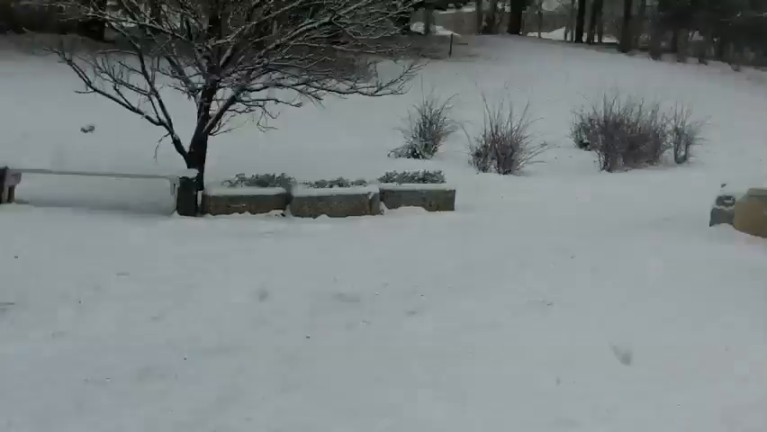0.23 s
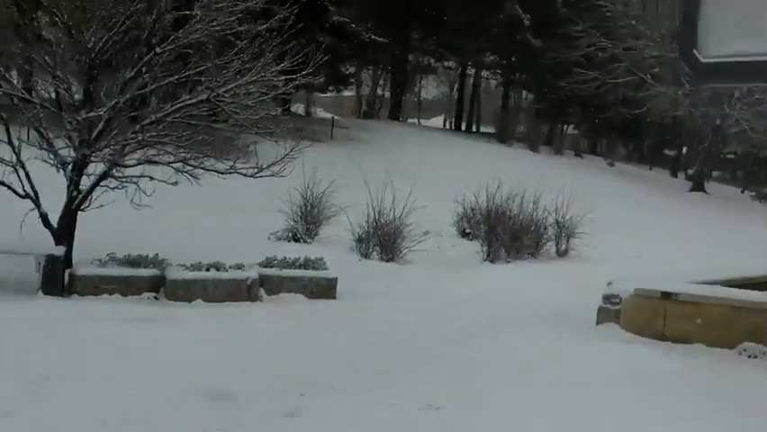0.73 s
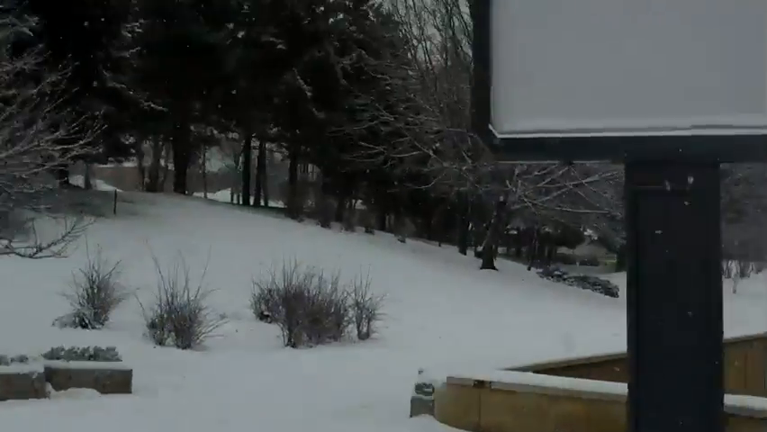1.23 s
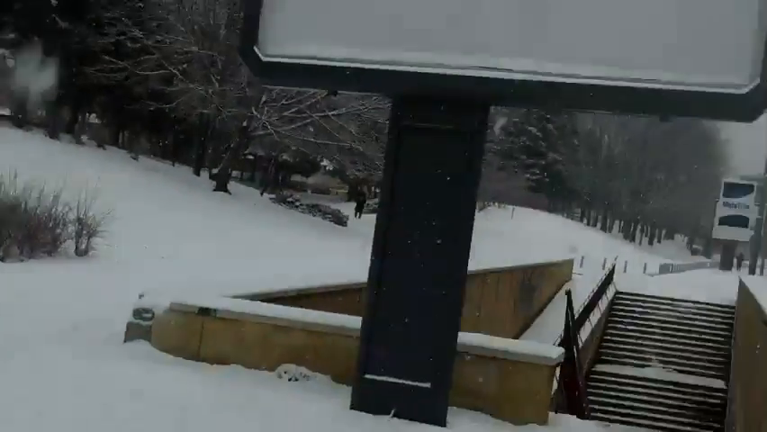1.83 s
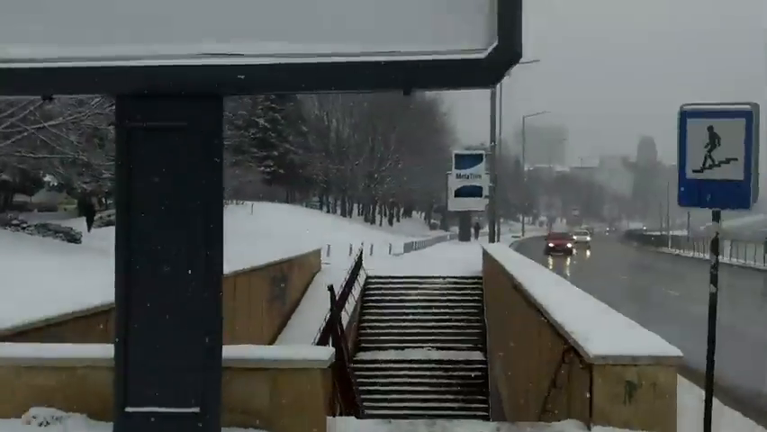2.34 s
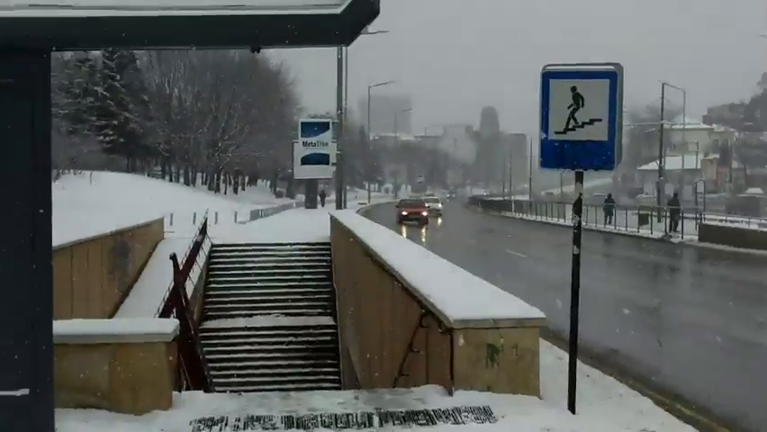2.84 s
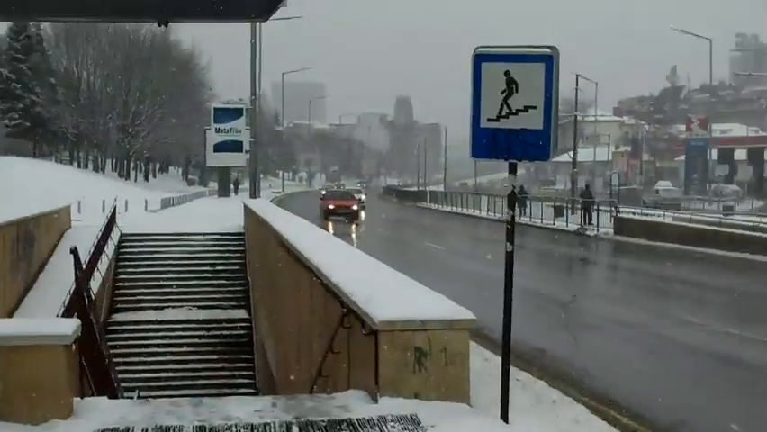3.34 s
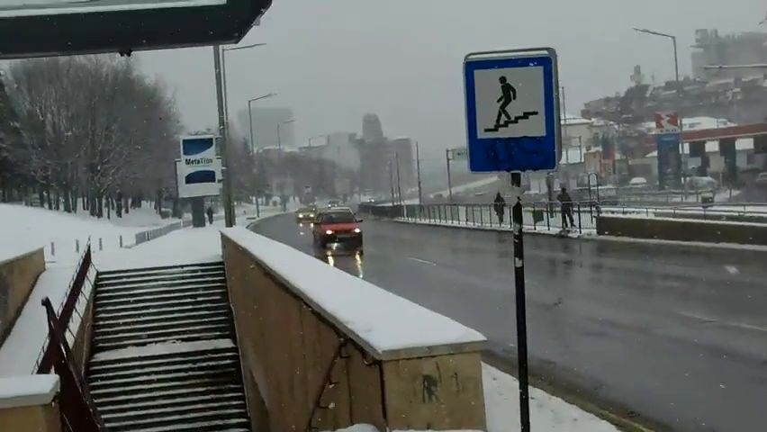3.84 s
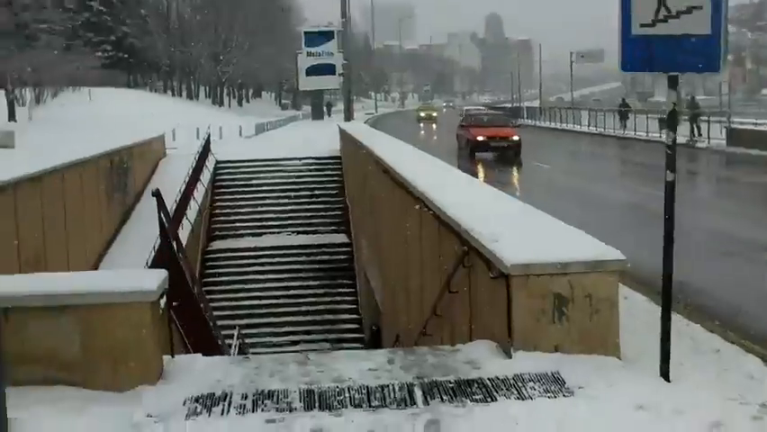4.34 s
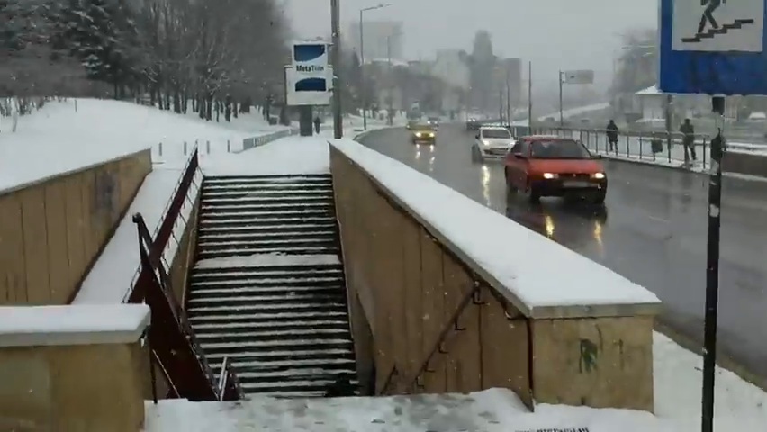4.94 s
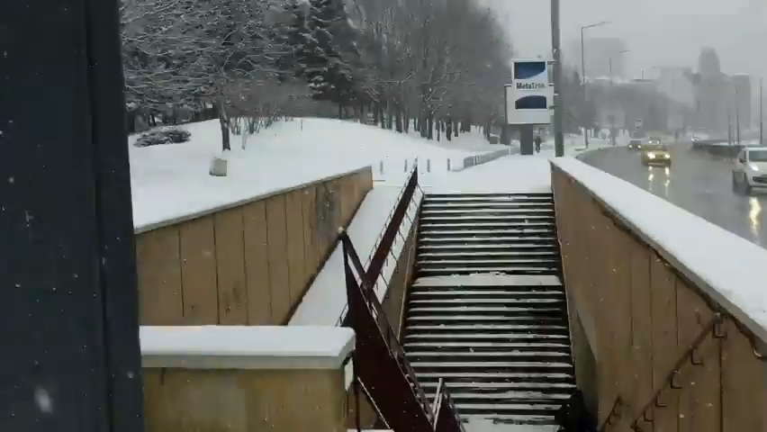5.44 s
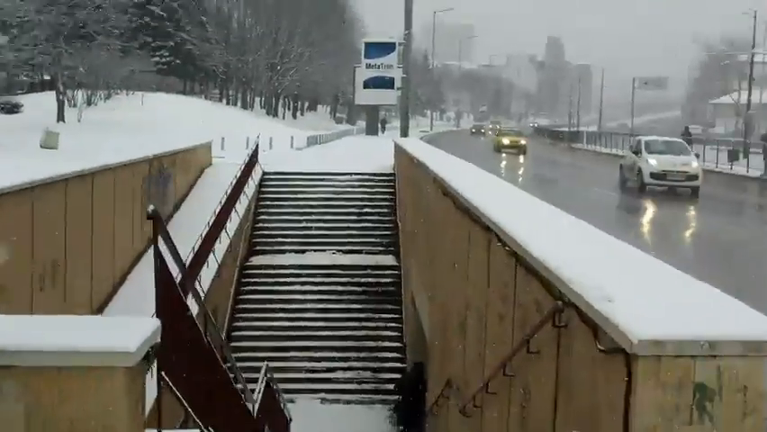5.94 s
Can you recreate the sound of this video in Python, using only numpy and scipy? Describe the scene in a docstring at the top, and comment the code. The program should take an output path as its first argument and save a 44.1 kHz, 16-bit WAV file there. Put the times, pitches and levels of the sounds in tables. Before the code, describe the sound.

An open, snowy roadside, heard through one slightly hissy microphone, equal in both ears. Low, steady city wash and faint engine hum lie beneath everything. From 0 to 0.65 seconds a few soft, low snowflake pats touch the microphone while a car's wet tyre swish grows. Short surges of hiss come at 0.7 to 1.0 seconds, and the car passes close at about 1.5, with a hollow swish gliding downward, grainy spray and a singing tread roar around 800 to 900 hertz. Treble drops away behind it; a dull double knock comes near 1.9. The roar recedes through 2 to 3.5 seconds, unevenly. A small slushy tick sounds at 4.1. From 4.3 a second car approaches, with brighter sizzle, fine spray and a low engine hum. A sharp slush splash hits at 5.7, and the wet hiss keeps swelling to the end at 6.2, as the car arrives.

```python
"""Cars on a slushy road

Heard from a snowy pavement: one car goes by after a second and a half and recedes; the next draws near
and splashes through slush near the end. Tyre roar, swish and spray are coloured noise and droplets
whose level follows each car's position. Faint engine hum is made of gliding cosines,
and snowflakes pat the microphone as short damped swings."""
import sys
import numpy as np
from scipy import signal
from scipy.fft import rfft, irfft, next_fast_len
from scipy.io import wavfile
from scipy.ndimage import uniform_filter1d

SR = 44100
rng = np.random.default_rng(int(sys.argv[2]) if len(sys.argv) > 2 else 0)


def generate_wav(sig):
    """Save sig (samples, or channels by samples) to the path in sys.argv[1] as 16-bit PCM at SR."""
    pcm = np.round(np.clip(np.atleast_2d(sig).T, -1, 1) * 32767).astype(np.int16)
    wavfile.write(sys.argv[1], SR, pcm)


N = 272777
HOP = 128  # samples between spectral frames
HZ = np.fft.rfftfreq(8 * HOP, 1 / SR)
FRAME_S = np.arange(N // HOP + 9) * HOP / SR
TIME = np.arange(N) / SR


def gain_of(db):
    """Decibels to amplitude."""
    return 10 ** (np.asarray(db) / 20)


def evened(x):
    """Scales to rms 1."""
    return x / np.sqrt(np.mean(x ** 2) + 1e-20)


def noise():
    """White noise of rms 1."""
    return rng.standard_normal(N)


def colour(points, hz):
    """Gain of a spectrum table, joined on a log-frequency axis and falling away beyond both ends."""
    f, db = np.transpose(points)
    ends = np.minimum(hz / f[0], 1) ** 2 / np.maximum(hz / f[-1], 1) ** 3
    return ends * gain_of(np.interp(np.log(hz + 1), np.log(f + 1), db))


def follow(rows, t):
    """All columns of a curve table at the times t."""
    s, *columns = np.transpose(rows)
    return [np.interp(t, s, c) for c in columns]


def active(rows):
    """Opens over the time span of a curve table, with short ramps at both ends."""
    inside = (TIME >= rows[0][0]) & (TIME <= rows[-1][0])
    return uniform_filter1d(1. * inside, size=4000)


def tinted(x, points):
    """Filters x by a spectrum table, to rms 1."""
    size = next_fast_len(N)
    gain = colour(points, np.fft.rfftfreq(size, 1 / SR))
    return evened(irfft(rfft(x, size) * gain, size)[:N])


def shaped(x, points, shift=1, focus=1, lift_db=0, patchy_db=1.3):
    """Colours x by a sliding, narrowing spectrum; turbulent air and wet ground leave drifting patches."""
    z = signal.stft(x, nperseg=8 * HOP, noverlap=7 * HOP)[2].T
    grain = rng.standard_normal((len(FRAME_S), len(HZ)))
    drifting = uniform_filter1d(grain, size=40, axis=0)
    patches = evened(uniform_filter1d(drifting, size=8, axis=1))
    gain = colour(points, HZ / shift) ** np.maximum(focus, .5) * gain_of(lift_db + patchy_db * patches)
    return evened(signal.istft((z * gain[:len(z)]).T, nperseg=8 * HOP, noverlap=7 * HOP)[1][:N])


def flutter(rate_hz):
    """Smooth random wander of rms 1, mostly below the given rate."""
    f = np.fft.rfftfreq(len(FRAME_S), HOP / SR)
    spectrum = rfft(rng.standard_normal(len(FRAME_S))) / (1 + (f / rate_hz) ** 4)
    slow = irfft(spectrum, len(FRAME_S))
    return np.interp(TIME, FRAME_S, evened(slow))


def droplets(per_s, spread_db):
    """Tiny impacts at random moments: many small, a few large."""
    size = gain_of(spread_db * np.minimum(rng.exponential(1, N), 5))
    return evened(size * rng.choice([-1, 1], N) * (rng.random(N) < per_s / SR))


def water(drops, per_s, spread_db):
    """Rushing water: a smooth hiss of mist with a share of the power in separate droplets."""
    return np.sqrt(1 - drops) * noise() + np.sqrt(drops) * droplets(per_s, spread_db)


STRETCH_EDGE_S = 0.034


def stretches(rows, t):
    """Each column of a table of time stretches, faded in and out at the times t."""
    start, end, *columns = np.transpose(rows)
    entered = np.tanh((t - start[:, None]) / STRETCH_EDGE_S)
    not_left = np.tanh((end[:, None] - t) / STRETCH_EDGE_S)
    return np.array(columns) @ ((entered + not_left) / 2)


# cars passing: abreast t/s, distance then [m], level/dB, tyre horn f/Hz, horn sharpness [factor],
# mist slope [dB per octave]
CARS = [(1.48, 6.06, 0, 840, 1.28, -7), (6.23, 2.69, -7.5, 830, 2.35, 6)]
SPEED_M_PER_S, REFERENCE_M = 14, 6


def drive_by(law, t):
    """Cars on a straight road plus distant traffic: level in dB, power shares, bearing (1 coming, -1 gone)."""
    level_db, loss_db, ahead_db, along_db, far_db = law
    abreast, distance, car_db = np.transpose(CARS)[:3, :, None]
    to_go = SPEED_M_PER_S * (abreast - t)
    reach = np.hypot(to_go, distance)
    bearing = to_go / reach
    spreading_db = loss_db * np.log2(reach / REFERENCE_M)
    direction_db = ahead_db * bearing + along_db * bearing ** 2
    power = gain_of(level_db + car_db - spreading_db + direction_db) ** 2
    total = power.sum(0) + gain_of(far_db) ** 2
    return 10 * np.log10(total), power / total, (power * bearing).sum(0) / total


def loudness(law):
    """Level of one tyre sound in dB, sample by sample."""
    return np.interp(TIME, FRAME_S, drive_by(law, FRAME_S)[0])


MICROPHONE_HISS_DB = -78


def microphone_hiss():
    """Even white self-noise of the microphone."""
    return gain_of(MICROPHONE_HISS_DB) * noise()


WHINE_HZ, WHINE_WIDTH_HZ, WHINE_DB = 7870, 130, -74.5


def whine():
    """A thin steady hiss in one narrow band, faint enough to show only in the lull between cars."""
    offset = (np.fft.rfftfreq(N, 1 / SR) - WHINE_HZ) / WHINE_WIDTH_HZ
    band = rfft(noise()) / (1 + offset ** 2)
    return gain_of(WHINE_DB) * evened(irfft(band, N))


# spectrum of the city wash: f/Hz, relative level/dB
CITY_COLOUR = [(20, -26), (38, -25), (55, -6), (75, -10), (110, -3.5), (170, 1), (270, 2), (400, -7),
               (900, -12), (4000, -13.5)]
CITY_DB = -60.5


def city_wash():
    """The steady low wash of the city: noise through a fixed spectrum."""
    return gain_of(CITY_DB) * tinted(noise(), CITY_COLOUR)


# low noise of tyre walls and bodywork: f/Hz, relative level/dB
RUMBLE_COLOUR = [(50, -13), (120, -12), (220, -5.5), (340, 2.5), (480, 0), (700, -2.5), (1500, -6)]
# how the rumble carries: level at 6 m/dB, loss per doubling of distance/dB, gain ahead of the car/dB,
# gain along the road both ways/dB, distant traffic level/dB
RUMBLE_LAW = (-46.5, 4.5, 2.5, -4, -67)


def rumble():
    """Tyre walls and bodywork shake the air: dull noise that rises and falls with the cars."""
    return gain_of(loudness(RUMBLE_LAW)) * tinted(noise(), RUMBLE_COLOUR)


# engine notes, one table each: t/s, firing f/Hz, level/dB
ENGINES = [
    [(0, 76.5, -68), (1.2, 76.1, -74), (3.5, 75, -79), (4.9, 76.8, -71), (6.19, 77.7, -76)],
    [(1.1, 67, -87), (1.4, 60.7, -75), (1.7, 56, -84), (2.3, 54.1, -86)],
    [(2.8, 91.2, -88), (3.6, 90.86, -73.5), (4.5, 89.9, -71.5), (5.5, 85, -86)],
    [(0, 156.6, -72), (0.42, 151, -63.5), (0.8, 150, -74), (1.1, 148.7, -88)],
    [(4.5, 147, -88), (4.85, 147, -66), (5.4, 149.6, -66), (6.19, 154.6, -69)],
]


def engine(rows, waver=0.0257, throb_db=1.5, octave_db=-11):
    """A firing note, wavering in pitch and level, with a weak octave."""
    hz, db = follow(rows, TIME)
    turn = 2 * np.pi * np.cumsum(hz * (1 + waver * flutter(rate_hz=9.1))) / SR
    note = np.sqrt(2) * (np.cos(turn) + gain_of(octave_db) * np.cos(2 * turn))
    return active(rows) * gain_of(db + throb_db * flutter(rate_hz=7.3)) * note


# snowflakes on the microphone: t/s, push level before the low cut/dB, f/Hz, length [cycles]
PATS = [(0.0486, -22, 560, .68), (0.168, -37, 380, 0.56), (0.4923, -23, 540, 0.89),
        (0.5081, -23, 440, 0.61), (0.515, -31, 420, 1.1), (0.5208, -23, 433, 1.04), (.55, -23.5, 328, 0.71),
        (0.6317, -20.5, 384, 0.63), (0.641, -29, 405, 0.69)]


def pat(s, db, hz, cycles, low_cut_hz=95, tail_db=-24, tail_s=0.017):
    """A soft push of air on the microphone port: a swing or two, then a brief dull rustle."""
    age = TIME - s
    push = np.exp(-(age * hz / cycles) ** 2) * np.cos(2 * np.pi * age * hz)
    fade = (age > 0) * np.exp(-abs(age) / tail_s)
    tail = gain_of(tail_db) * fade * tinted(noise(), RUMBLE_COLOUR)
    low_cut = signal.butter(2, low_cut_hz, "high", fs=SR, output="sos")
    return gain_of(db) * signal.sosfilt(low_cut, push + tail + 1e-18)


def singing(rows, width_hz, steady):
    """Noise in one gliding resonance; the rolling tyre keeps feeding it, which evens out its level."""
    hz, db = follow(rows, TIME)
    low_pass = signal.butter(2, width_hz / 2, fs=SR, output="sos")
    band = signal.sosfilt(low_pass, noise() + 1j * noise())
    band = band / (uniform_filter1d(abs(band) ** 2, size=2000) + 1e-12) ** (steady / 2)
    carrier = np.exp(2j * np.pi * np.cumsum(hz) / SR)
    return active(rows) * gain_of(db) * evened((band * carrier).real)


# the tread sings in a band, one table per car: t/s, f/Hz, level/dB
TREAD_SONGS = [
    [(0.9, 1047, -52), (1.08, 998, -38), (1.2, 953, -42), (1.32, 876, -33.5), (1.46, 921, -33.5),
     (1.61, 928, -37), (1.68, 897, -43.5), (2.28, 769.5, -52), (2.65, 799, -58), (2.92, 806.5, -51),
     (3.12, 770, -59), (3.42, 837, -45.5), (3.7, 826, -62)],
    [(5.2, 802, -55), (5.55, 808, -45), (5.75, 800, -43), (5.92, 763.5, -38.5), (6.19, 739, -40)],
]
# bandwidth of each car's song [Hz]
SONG_WIDTHS_HZ = [250, 173]
# hollow peak of the swish, sinking as the first car goes by: t/s, f/Hz, level/dB
SWISH_PEAK = [(0.2, 1870, -55), (0.6, 1858, -44.5), (0.85, 1780, -38), (0.97, 1592, -46), (1.32, 1590, -49),
              (1.5, 1375, -41), (1.72, 1470, -59), (2.0, 1507, -50.5), (2.7, 1466, -52), (3.0, 1480, -66)]
# underbody drone as the first car comes abreast: t/s, f/Hz, level/dB
UNDERBODY = [(0.9, 340, -65), (1.05, 330, -57.5), (1.46, 280, -54), (1.75, 240, -56.5), (2.2, 230, -75)]


def tyre_tones():
    """Gliding resonances: each car's tread song, the hollow peak of the swish and the underbody drone."""
    songs = sum(singing(rows, width_hz, steady=0.63) for rows, width_hz in zip(TREAD_SONGS, SONG_WIDTHS_HZ))
    hollow = singing(SWISH_PEAK, width_hz=230, steady=0.46)
    drone = singing(UNDERBODY, width_hz=115, steady=0.3)
    return songs + hollow + drone


# spectrum of the tread roar before it slides and sharpens: f/Hz, relative level/dB
ROAR_COLOUR = [(420, -15), (520, -7), (630, -4), (750, -1.5), (930, -2), (1150, -4.5), (1600, -13),
               (3000, -64)]
# how the roar carries: level at 6 m/dB, loss per doubling of distance/dB, gain ahead of the car/dB,
# gain along the road both ways/dB, distant traffic level/dB
ROAR_LAW = (-38, 6, 1.4, 4, -54)
# roar swells, as on coarser asphalt: start t/s, end t/s, extra level/dB
COARSE_STRETCHES = [(0, 0.56, 1.5), (0.98, 1.56, 2.5), (1.7, 2.02, 1), (2.5, 3.56, 0.5)]


def tread_roar(rest_hz=820, far_hz=835, lower_ahead_hz=45):
    """Air pumped from the tread rings in the horn of tyre and road, a little lower ahead of a car."""
    _, share, bearing = drive_by(ROAR_LAW, FRAME_S)
    _, _, _, horn_hz, sharpness, _ = np.transpose(CARS)
    # each car pulls pitch and sharpness by its share of the power
    hz = far_hz + (horn_hz - far_hz) @ share - lower_ahead_hz * np.maximum(bearing, 0)
    focus = 1 + ((sharpness - 1) @ share)[:, None]
    shift = hz[:, None] / rest_hz
    air = shaped(noise(), ROAR_COLOUR, shift, focus, lift_db=10 * np.log10(focus), patchy_db=0)
    return air * gain_of(loudness(ROAR_LAW) + stretches(COARSE_STRETCHES, TIME)[0])


# how the finest spray carries: level at 6 m/dB, loss per doubling of distance/dB,
# gain ahead of the car/dB, gain along the road both ways/dB, distant traffic level/dB
SPRAY_LAW = (-47, 9, 10, -3.5, -65)
# stretches of road, wetter or drier: start t/s, end t/s, spray and sizzle level change/dB
# (sizzle and spray each scale it), mist slope change [dB per octave]
ROAD_STRETCHES = [(0.48, 0.66, -1, 11), (0.66, 1.1, 2.5, 11.5), (1.1, 1.66, 4.5, 9), (3.7, 4.34, 0, 7),
                  (4.34, 4.6, 4.5, 7), (4.6, 5.06, 5, -1), (5.06, 5.85, 4, 4), (6.1, 6.4, -2, -4)]
# mist slope in dB per octave: base, and the part that follows the bearing
MIST_DB, MIST_AHEAD_DB = -4, 1.5


def mist(mist_hz=7000):
    """Finest spray tilts the treble by bearing, car and stretch of road: dB by frame and frequency."""
    _, share, bearing = drive_by(SPRAY_LAW, FRAME_S)
    _, road_slope = stretches(ROAD_STRETCHES, FRAME_S)
    slope = MIST_DB + MIST_AHEAD_DB * bearing + road_slope + np.transpose(CARS)[-1] @ share
    return slope[:, None] * np.log2(np.maximum(HZ / mist_hz, 1))


# spectra of the water film, its sizzling edge and the flying spray: f/Hz, relative level/dB
SWISH_COLOUR = [(600, -15), (850, -15), (1150, -3.5), (1500, -1), (2000, -1.5), (2800, -2.5), (3500, -12),
                (6000, -30.5)]
SIZZLE_COLOUR = [(1800, -26), (2900, 3), (3600, 4.5), (4600, 0.5), (5400, -4.5), (6300, -8), (8000, -19.5),
                 (15000, -35.5)]
SPRAY_COLOUR = [(3500, -13.5), (5400, 1.5), (6400, 1.5), (7100, 0.5), (7900, -0.5), (9000, -4.5),
                (10300, -8.5), (11700, -16), (13300, -17.5), (15300, -25)]
# how swish and sizzle carry: level at 6 m/dB, loss per doubling of distance/dB,
# gain ahead of the car/dB, gain along the road both ways/dB, distant traffic level/dB
SWISH_LAW = (-36, 6, 11, -0.2, -46)
SIZZLE_LAW = (-44.5, 7.5, 9, 1.55, -52.5)
# brief dips of the wet hiss: start t/s, end t/s, level change/dB
HISS_DIPS = [(0.5, 0.82, -1.5), (1.66, 1.9, -1.3), (2.95, 3.36, -1), (5.2, 5.45, -1), (5.97, 6.1, -1.3)]


def wet_tyres(puddle_db=0.21, sizzle_per_change=0.57, spray_per_change=0.85):
    """Uneven water depth shakes swish, sizzle and spray together; the swish narrows ahead of a car."""
    change_db, _ = stretches(ROAD_STRETCHES, TIME)
    _, _, bearing = drive_by(SWISH_LAW, FRAME_S)
    focus = 0.82 + 0.69 * bearing[:, None]
    film = shaped(water(drops=0.21, per_s=3000, spread_db=2.0), SWISH_COLOUR, 0.92, focus, patchy_db=1.1)
    edge = shaped(water(drops=0.55, per_s=4000, spread_db=0.0), SIZZLE_COLOUR, patchy_db=1.17)
    flying = water(drops=0.14, per_s=5400, spread_db=5.5)
    flying = shaped(flying, SPRAY_COLOUR, lift_db=mist(), patchy_db=2.1)
    swish = gain_of(loudness(SWISH_LAW)) * film
    sizzle = gain_of(loudness(SIZZLE_LAW) + sizzle_per_change * change_db) * edge
    spray = gain_of(loudness(SPRAY_LAW) + spray_per_change * change_db) * flying
    shake_db = puddle_db * flutter(rate_hz=93) + stretches(HISS_DIPS, TIME)[0]
    return gain_of(shake_db) * (swish + sizzle + spray)


# short noise bursts: swells of swish, a dull knock near 1.9 s, splashes in slush: t/s, level/dB,
# centre f/Hz, spread each way [octaves], rise time constant [s], decay time constant [s]
BURSTS = [(0.68, -38, 2480, 0.3, 0.012, 0.056), (0.875, -34, 1900, 0.38, 0.021, 0.092),
          (0.97, -39, 1620, 0.13, 0.017, 0.045), (1.245, -43, 6400, 0.3, 0.03, 0.03),
          (1.8616, -31.5, 904, 0.34, 0.014, 0.012), (1.93, -37, 1110, 0.41, 0.015, 0.011),
          (4.0865, -43, 2200, 0.7, 0.008, 0.022), (4.42, -52.5, 5160, 0.63, 0.041, 0.033),
          (5.13, -46, 4400, 0.65, 0.014, 0.032), (5.7235, -32, 3000, 0.69, 0.002, 0.01),
          (5.735, -26.5, 1750, 0.64, 0.0065, 0.013)]


def noise_burst(s, db, hz, octaves, rise, decay, thud_db=-18):
    """A short burst of hiss and droplets in one band, over a faint dull thud."""
    edges = np.clip([hz / 2 ** octaves, hz * 2 ** octaves], 30, .45 * SR)
    band_pass = signal.butter(2, edges, "band", fs=SR, output="sos")
    burst = evened(signal.sosfilt(band_pass, water(drops=0.19, per_s=2000, spread_db=4.5)))
    thud = gain_of(thud_db) * tinted(noise(), RUMBLE_COLOUR)
    envelope = np.exp(np.minimum((TIME - s) / rise, (s - TIME) / decay))
    return gain_of(db) * (burst + thud) * envelope


# reflection off a surface beside the microphone, perhaps the hand: t/s, strength [factor]
REFLECTION = [(0, 0.12), (0.7, 0.1), (1.15, 0.073), (1.5, 0.034), (4.8, 0.011), (5.7, 0.092), (6.19, .12)]
REFLECTION_SPACING_HZ = 1597  # between ripples; the echo lags by one over this


def reflected(x):
    """A nearby surface adds a very short echo, which ripples the treble."""
    strength, = follow(REFLECTION, TIME)
    size = next_fast_len(N)
    delay = np.exp(-2j * np.pi * np.fft.rfftfreq(size, 1 / SR) / REFLECTION_SPACING_HZ)
    echo = irfft(rfft(x, size) * delay, size)[:N]
    return x + strength * echo


def scene():
    """The whole street reaches one microphone, the same in both ears."""
    background = microphone_hiss() + whine() + city_wash()
    engines = sum(engine(rows) for rows in ENGINES)
    snow = sum(pat(*row) for row in PATS)
    dry_tyres = rumble() + tyre_tones() + tread_roar()
    wet = reflected(wet_tyres() + sum(noise_burst(*row) for row in BURSTS))
    mono = background + engines + snow + dry_tyres + wet
    return np.array([mono, mono])


EDGE_HZ = 15330


def record(dry):
    """The camera's band limit: a steep low-pass."""
    low_pass = signal.firwin(1023, EDGE_HZ, window=("kaiser", 9), fs=SR)
    return signal.oaconvolve(dry, low_pass[None], "same")


dry = scene()
out = record(dry)
generate_wav(out)
```